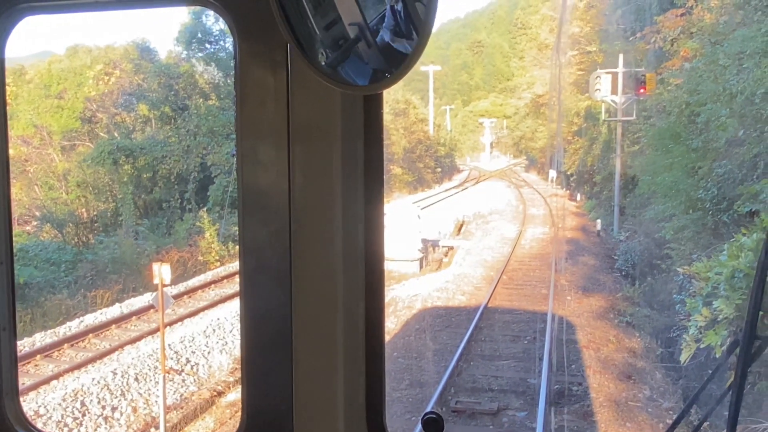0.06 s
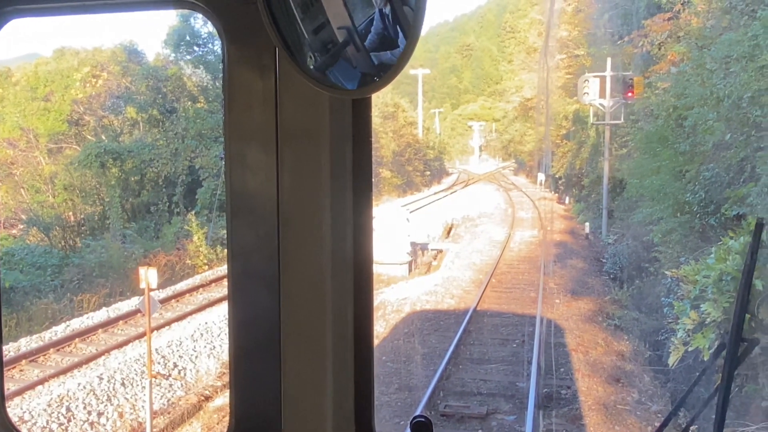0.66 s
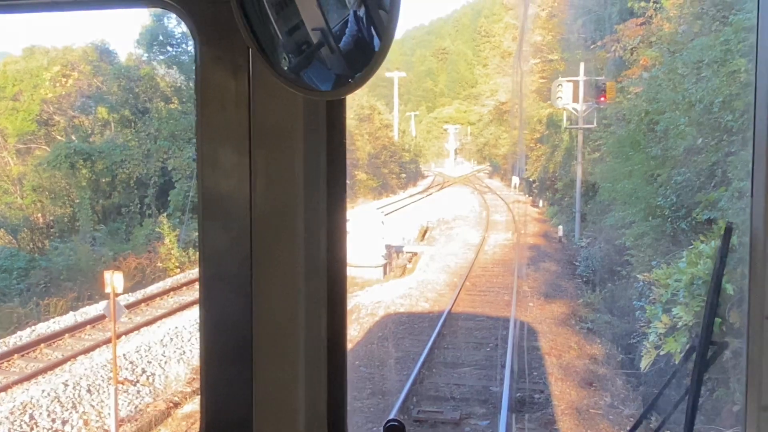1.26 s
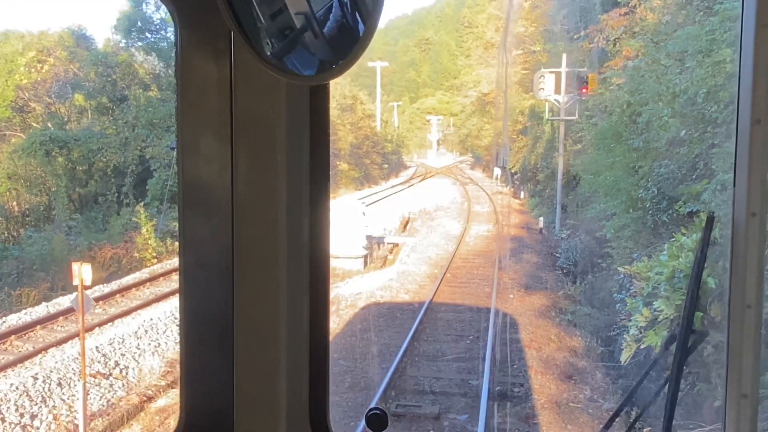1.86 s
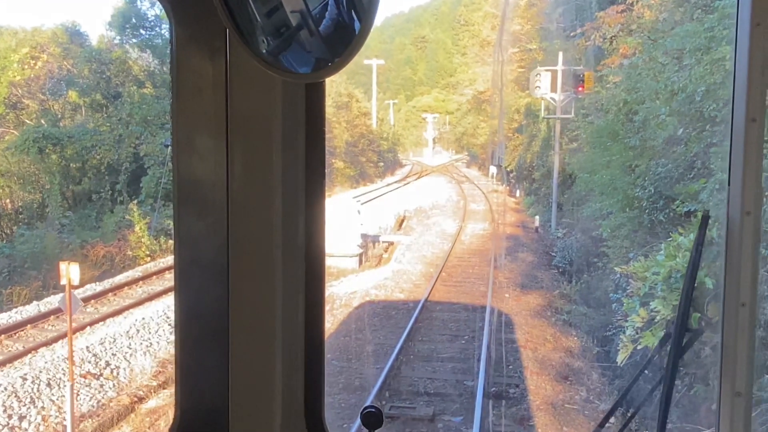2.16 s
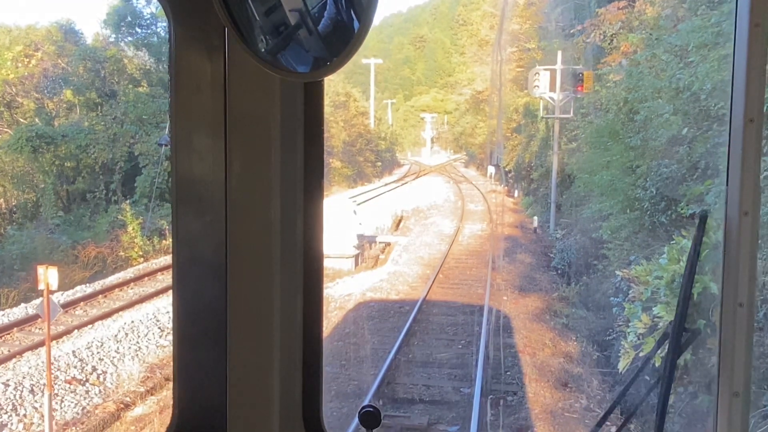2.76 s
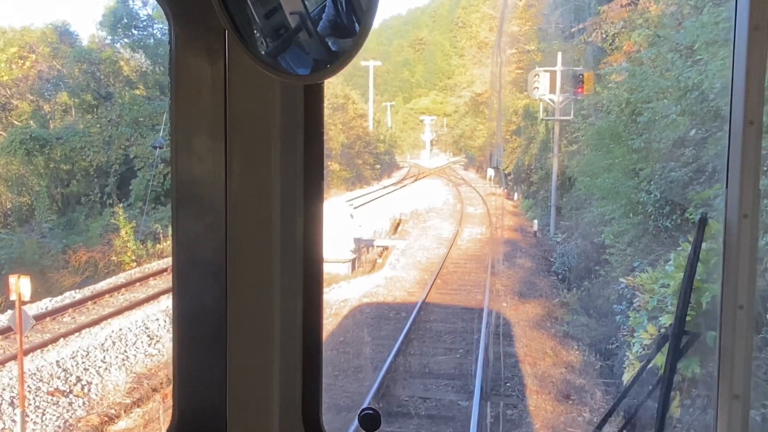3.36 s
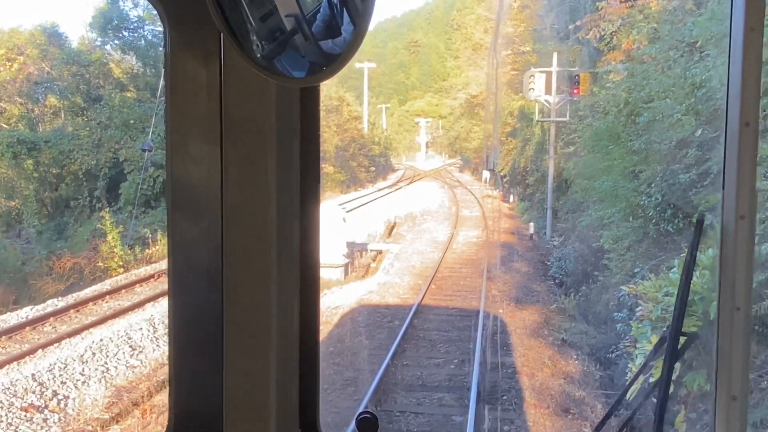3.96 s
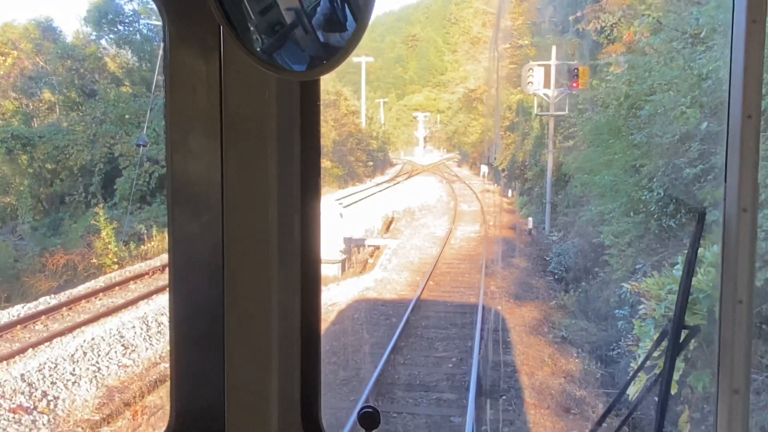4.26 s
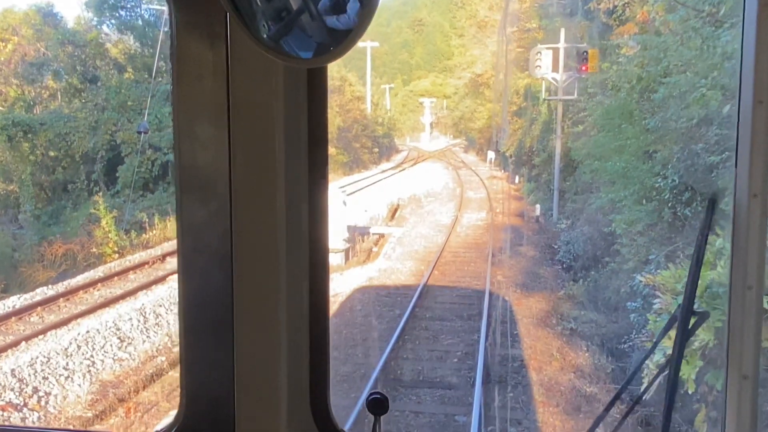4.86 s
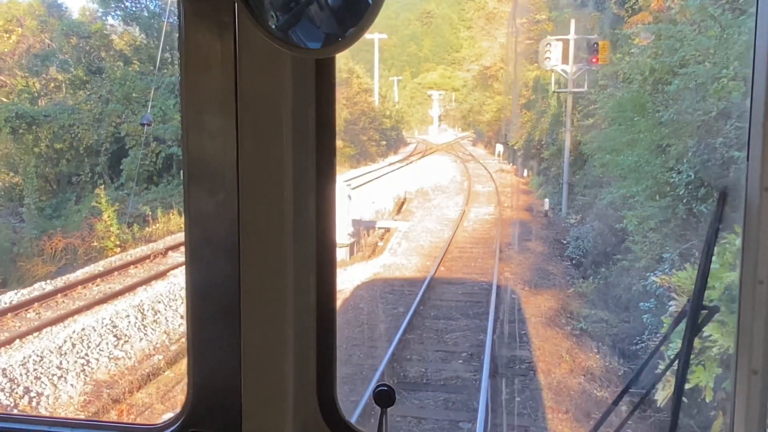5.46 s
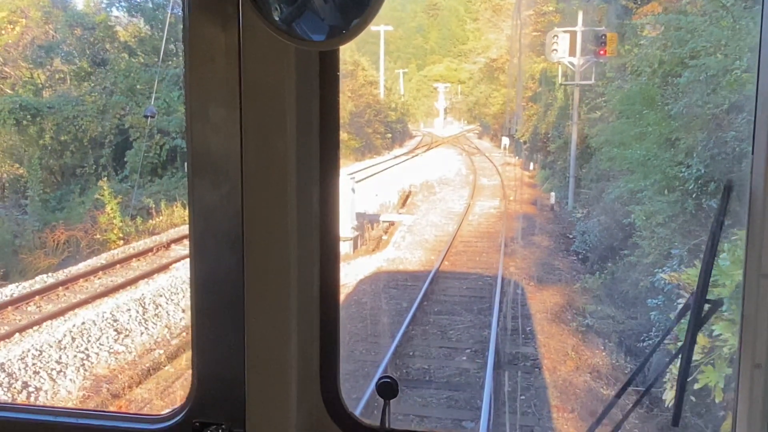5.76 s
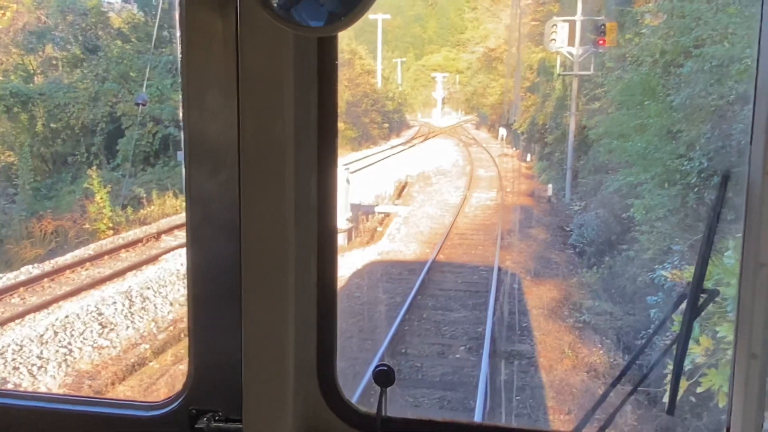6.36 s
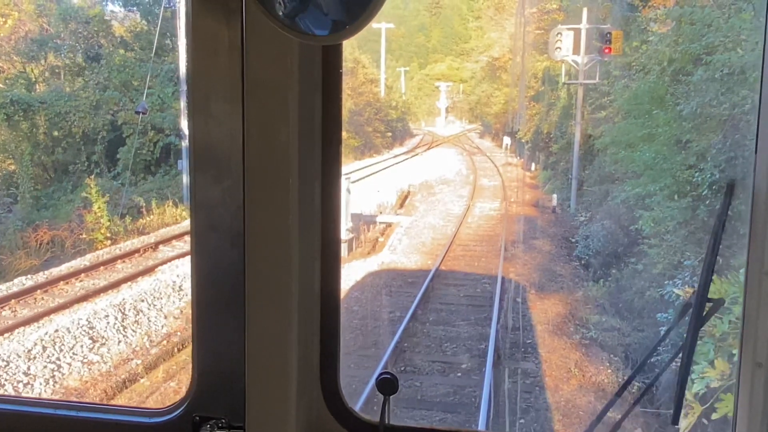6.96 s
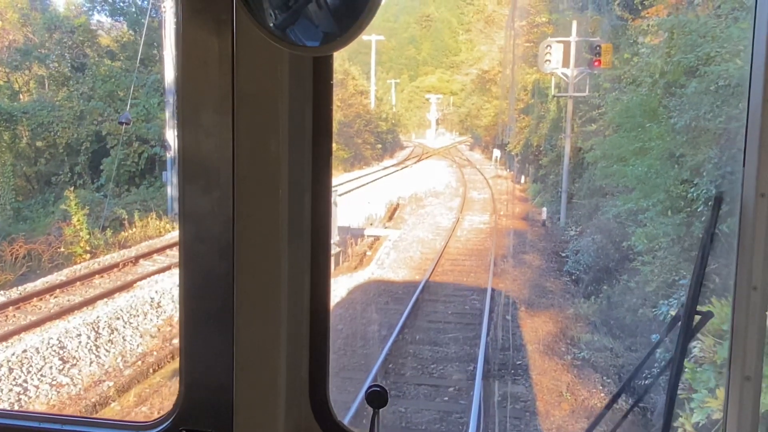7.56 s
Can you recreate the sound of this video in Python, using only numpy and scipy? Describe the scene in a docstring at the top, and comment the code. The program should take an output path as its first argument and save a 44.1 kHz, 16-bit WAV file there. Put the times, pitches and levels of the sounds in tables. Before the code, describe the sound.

Inside the cab of a diesel railcar, the engine revs up at once and holds high speed from about 1 second, with a booming exhaust, knocking through the floor and a loose fitting buzzing. Low body rumble, steady ventilation and a faint high electronic sizzle run throughout, and a second engine drones further back. A light click comes at 1.3 seconds. At 3.5 seconds an air valve puffs and the engine falls to an uneven idle, with a short low groan at 4 seconds. Brake air swells to a peak near 5.7 seconds while the engine labours briefly. Low clunks sound between 5.6 and 5.9 seconds, followed by a sharp click at 6 seconds, with brief squeaks from the running gear around them. From about 6.5 seconds the engine revs up again, staying loud until the end at around 7.5 seconds.

```python
"""Diesel railcar cab, creeping away

The six-cylinder engine runs up, falls back to idle and runs up again. Its exhaust booms in the cab,
its knock comes through the floor and a loose fitting buzzes with the firings. A second engine drones
further back. Air valves hiss, controls click and running gear squeaks over a bed of body rumble,
ventilation and faintly sizzling electronics."""
import sys
import numpy as np
from scipy import signal
from scipy.fft import rfft, irfft, next_fast_len
from scipy.io import wavfile
from scipy.ndimage import uniform_filter1d

SR = 44100
rng = np.random.default_rng(int(sys.argv[2]) if len(sys.argv) > 2 else 0)


def wrap_up_sound(samples):
    """Save the sound to the file named by the first command line argument, as 16-bit audio."""
    columns = np.atleast_2d(samples).T
    # keep every value between -1 and 1, then stretch to whole-number steps
    tamed = np.clip(columns, -1, 1)
    steps = np.round(tamed * 32767).astype(np.int16)
    wavfile.write(sys.argv[1], SR, steps)


N = 340011
TIME = np.arange(N) / SR
CYLINDERS, TOP_SPEED = 6, 46.28   # engine speeds are in firings per second


def from_db(db):
    """Decibels to gain."""
    return 10 ** (np.asarray(db) / 20)


def rms_one(x):
    """Scale to unit power."""
    return x / np.sqrt(np.mean(x ** 2) + 1e-20)


def noise():
    """White noise."""
    return rng.standard_normal(N)


def drift(rate_hz):
    """Smooth random wander at unit power."""
    knots = rng.standard_normal(4000)
    return rms_one(np.interp(TIME * rate_hz, np.arange(len(knots)), knots))


def swell(centre_s, half_width_s):
    """A bell curve of height 1."""
    return np.exp(-.5 * ((TIME - centre_s) / half_width_s) ** 2)


def through(x, response):
    """Filter by a gain given as a function of Hz."""
    size = next_fast_len(N + SR // 2)
    hz = np.fft.rfftfreq(size, 1 / SR) + 1e-3
    return irfft(rfft(x, size) * response(hz), size)[:N]


def colour(x, points):
    """EQ curve with steep skirts beyond its ends; unit power."""
    hz, db = np.transpose(points)
    skirts = lambda f: 1 / np.sqrt((1 + (.8 * hz[0] / f) ** 8) * (1 + (.8 * f / hz[-1]) ** 8))
    return rms_one(through(x, lambda f: skirts(f) * from_db(np.interp(np.log(f), np.log(hz), db))))


def resonate(x, hz, *widths_hz):
    """Resonators in series, one per width, each peaking at gain 1."""
    for width in widths_hz:
        r = np.exp(-np.pi * width / SR)
        feedback = [1, -2 * r * np.cos(2 * np.pi * hz / SR), r * r]
        x = signal.lfilter(np.array([1, 0, -1]) * (1 - r * r) / 2, feedback, x)
    return x


# The breath of the fan. Each row: frequency in Hz, relative level in dB.
FAN_EQ = [(400, -12), (600, -2.5), (1000, -16.5), (1200, -21), (1750, -12), (2200, -18), (4200, -26),
          (6200, -36), (7900, -34), (11200, -36), (14000, -41), (15500, -56)]

def ventilation(level_db=-45):
    """The fan fills the cab with a steady wash of air."""
    return from_db(level_db) * colour(noise(), FAN_EQ)


# A thin band of sizzle. Each row: frequency in Hz, relative level in dB.
SIZZLE_EQ = [(7800, -20), (8800, 1), (9400, 5), (9800, 6.5), (10250, 3.5), (10600, -3), (11200, -30)]

def electronics(sweep_rate_hz=23.4, centre_hz=9750, swing_hz=450, tone_db=-56, band_db=-54):
    """A rough high carrier sweeps down over and over inside a pulsing sizzle."""
    sweeps = TIME * sweep_rate_hz
    hz = centre_hz + swing_hz * (1 - 2 * (sweeps % 1)) + 150 * drift(500)
    carrier = from_db(tone_db) * np.sin(2 * np.pi * np.cumsum(hz) / SR)
    pulsing = 1 + .23 * (np.sin(2 * np.pi * sweeps) + np.sin(2 * np.pi * 3 * sweeps))
    return pulsing * (carrier + from_db(band_db) * colour(noise(), SIZZLE_EQ))


# The weight of the car body. Each row: frequency in Hz, relative level in dB.
BODY_EQ = [(28, -11), (45, -0.5), (70, 11.5), (110, 0), (170, 2), (220, 3.5), (290, 6), (390, 2.5),
           (460, -10.5), (800, -6.5)]

def body_rumble(level_db):
    """The car body shakes with a low, broad rumble."""
    return from_db(level_db) * colour(noise(), BODY_EQ)


def panel(floor_db, hz=895, width_hz=116.2, relative_db=-11.5):
    """The vibrating floor keeps a cab panel ringing."""
    return from_db(floor_db + relative_db) * rms_one(resonate(noise(), hz, width_hz, width_hz))


# The drone comes forward. Each row: centre and half width in seconds, level of the swell in dB.
DRONE_RISES = [(.28, 0.24, -23), (.78, 0.13, -30), (5.47, .36, -20.5), (6.8, 0.36, -24.5)]

def second_engine(revs, drone_hz=65.85, sag_hz=4.97, bed_db=-38):
    """A drone carried along the car sags once under load; at full revs only its swells remain."""
    hz = drone_hz - sag_hz * swell(6.35, .189)
    swells = sum(from_db(db) * swell(s, width) for s, width, db in DRONE_RISES)
    gain = from_db(bed_db) * (1 - revs) + swells
    return gain * np.sqrt(2) * np.sin(2 * np.pi * np.cumsum(hz) / SR)


# Squeaks and groans. Each row: start and length in seconds, first and last pitch in Hz, level in dB.
GEAR_SQUEAKS = [(0.23, 0.2, 5570, 5580, -61), (3.97, 0.34, 308, 285, -35.5), (5.74, 0.23, 2140, 2156, -50),
                (6.175, 0.17, 898, 884, -37), (6.598, 0.4, 5480, 5620, -61)]

def squeaks(waver=.018):
    """Rubbing parts of the running gear sing briefly on an unsteady pitch."""
    out = np.zeros(N)
    for start, length, first_hz, last_hz, db in GEAR_SQUEAKS:
        along = np.clip((TIME - start) / length, 0, 1)
        hz = (first_hz + (last_hz - first_hz) * along) * (1 + waver * drift(400))
        tone = np.sqrt(2) * np.sin(2 * np.pi * np.cumsum(hz) / SR)
        out += from_db(db) * np.sin(np.pi * along) * tone
    return out


# Puffs, clunks and clicks. Each row: start in seconds, level in dB, centre in Hz,
# half width in octaves, attack in seconds, time to fall 60 dB in seconds.
CLICK_CUES = [(1.265, -44, 4000, 0.34, 0.0071, 0.11), (3.477, -36, 2375, 0.52, .008, 0.38),
              (3.48, -36.5, 6500, .6, .005, 0.19), (4.236, -59, 13000, .3, .01, .16),
              (5.242, -52, 12900, .3, 0.0056, .08), (5.58, -32.5, 334, 0.24, 0.048, 0.79),
              (5.6, -31, 1010, 0.28, 0.034, 0.2), (5.83, -38, 1550, 0.22, 0.018, 0.27),
              (5.858, -24.5, 283, 0.3, .006, 0.3), (5.87, -51, 13000, .3, .02, .4),
              (5.954, -39, 12950, 1.2, 0.0077, 0.25), (5.962, -26.5, 12500, 1.5, .0006, 0.016),
              (6.278, -50, 4750, .1, .006, .12), (6.279, -62, 13050, .03, .006, .06)]

def clicks():
    """Valves, couplings and levers give short bursts of noise that die in the cab."""
    out = np.zeros(N)
    for start, db, hz, octaves, attack, t60 in CLICK_CUES:
        age = np.maximum(TIME - start, 0)
        burst = rms_one(through(noise(), lambda f: np.exp(-.5 * (np.log2(f / hz) / octaves) ** 2)))
        decay_db = 60 * np.clip((age - attack) / t60, 0, 2)
        out += burst * np.minimum(age / attack, 1) * from_db(db - decay_db)
    return out


# The hiss of the brakes. Each row: frequency in Hz, relative level in dB.
AIR_EQ = [(1500, 20.5), (3000, 12.5), (5000, 8.5), (8000, 7.5), (11000, 4), (13000, 6), (15500, -1)]

def brake_air(peak_s=5.69, peak_db=-40.5, rise_db_per_s=28.5, fall_db_per_s=78):
    """Brake air swells through an exhaust port and dies away."""
    age = TIME - peak_s
    db = peak_db + np.minimum(rise_db_per_s * age, -fall_db_per_s * age)
    return from_db(db) * colour(noise(), AIR_EQ)


# The fitting's bright modes. Each row: frequency and nominal width in Hz, relative level in dB.
FITTING_MODES = [(5360, 190, 2), (6950, 14000, -5), (11620, 1700, -6.5), (12440, 250, 7.5),
                 (13250, 3000, 1.5), (13900, 1200, -12), (14200, 280, 1), (15400, 600, 0)]

def fitting_buzz(cycle, speed, settling_db, idle_db=-73, loose_db=-49):
    """Every firing shakes a loose fitting into a short chatter, louder at speed."""
    db = settling_db + np.interp(speed, [30.4, 43.3], [idle_db, loose_db])
    since_firing = (CYLINDERS * cycle) % 1
    chatter = noise() * np.exp(-1.2 * since_firing) * from_db(1.5 * drift(46))
    ringing = sum(from_db(mode_db) * resonate(chatter, hz, 1.3 * width, 1.3 * width)
                  for hz, width, mode_db in FITTING_MODES)
    return from_db(db) * rms_one(ringing)


# The driver's two run-ups. Each row, all in seconds: throttle opened, throttle shut,
# delay to the steepest climb in speed, time constant of the climb.
RUN_UPS = [(-.26, 3.61, .65, .085), (6.25, 9, .555, .1)]

def throttle(fuel_rise_s=.37, fuel_cut_s=.16, coast_s=.19):
    """Fuel and revs, each 0-1: revs follow late on an S-curve and coast down when fuel is cut."""
    fuel, revs = np.zeros(N), np.zeros(N)
    for opened, shut, delay, climb_s in RUN_UPS:
        since_shut = np.maximum(TIME - shut, 0)
        fed = np.clip((TIME - opened) / fuel_rise_s, 0, 1)
        fuel += fed * np.clip(1 - since_shut / fuel_cut_s, 0, 1)
        climb = .5 + .5 * np.tanh((TIME - opened - delay) / (2 * climb_s))
        revs += climb * np.exp(-(since_shut / coast_s) ** 2)
    return fuel, revs


# The hunting idle. Each row: time in seconds, speed in firings per second.
IDLE_HUNT = [(3.9, 32.5), (4.6, 30), (5.1, 33.2), (5.55, 33.4), (5.7, 36), (6, 36), (6.3, 31.2),
             (6.6, 32.5)]

def engine_speed(revs):
    """The revs lift the engine from idle to the speed held by the governor."""
    idle = np.interp(TIME, *np.transpose(IDLE_HUNT))
    return idle + (TOP_SPEED - idle) * revs


# Rides on the rattle. Each row: seconds after the steepest climb, half width in seconds,
# buzz change in dB, clatter change in dB.
RATTLE_RIDES = [(.58, .15, 5, 1), (.94, 0.082, -10, -.5), (1.35, 0.45, -3, -0.66)]

def settling():
    """After each run-up, buzz and clatter peak, drop and creep back; two curves in dB."""
    return sum(np.outer([buzz_db, clatter_db], swell(opened + delay + after, width))
               for opened, _, delay, _ in RUN_UPS for after, width, buzz_db, clatter_db in RATTLE_RIDES)


# The idling engine eases, then labours as the drive takes hold. Each row: centre and half width
# in seconds, then the change of boom, growl and knock in dB.
LOAD_SURGES = [(4.02, .1, 4.5, -14, -1.5), (5.6, 0.22, -2, 5, 6), (5.71, 0.074, 14, 1, 0),
               (6.162, 0.075, 10.5, -4, 3)]

def effort(fuel, revs, speed):
    """Boom, growl, knock and rumble levels in dB; the engine flares just short of top speed."""
    flare = fuel * np.interp(speed, [36.8, 44.34, TOP_SPEED], [0, 1, 0])
    boom = -29 + 10.5 * fuel + 5.5 * revs - .5 * flare
    growl = -36 + 10.5 * fuel - 2 * revs + 12.5 * flare
    knocking = -40 + 9.5 * fuel + 2.5 * revs + 2.5 * flare
    body = -33.5 + 5 * fuel - 2 * revs + 1.5 * flare
    for s, width, boom_db, growl_db, knock_db in LOAD_SURGES:
        surge = swell(s, width)
        boom += boom_db * surge
        growl += growl_db * surge
        knocking += knock_db * surge
        body += .5 * knock_db * surge
    return boom, growl, knocking, body


def cylinder_blows(cycle, build_up_s=.012, ring_t60_s=.13, vary_db=.5):
    """Each cylinder strikes the frame with its own echo pattern, which builds up and rings out."""
    fired = np.flatnonzero(np.diff(np.floor(cycle * CYLINDERS))) + 1
    age = np.arange(SR // 6) / SR
    envelope = (1 - np.exp(-age / build_up_s)) * from_db(-60 * age / ring_t60_s)
    paths = rng.standard_normal((CYLINDERS, len(age))) * envelope
    blows = np.zeros(N)
    for cylinder, path in enumerate(paths):
        at = fired[cylinder::CYLINDERS]
        strikes = np.zeros(N)
        strikes[at] = from_db(vary_db * rng.standard_normal(100)[:len(at)])
        blows += signal.fftconvolve(strikes, path)[:N]
    return rms_one(blows)


# Knock heard through the floor. Each row: frequency in Hz, relative level in dB.
FLOOR_EQ = [(200, -10.5), (280, -7), (400, -17.5), (450, -7), (600, -8), (740, -6), (860, -2), (1030, -4),
            (1180, -10.5), (1900, -17), (2600, -25), (5200, -34), (8000, -42.5)]
# The ring of the engine block. Each row: frequency in Hz, relative level in dB.
BLOCK_MODES = [(402, -14), (671, -21.5), (763, -17), (817, -10.5), (856, -16.5), (895, -26), (958, -22),
               (1018, -22.5), (1064, -20.5), (1272, -22), (1504, -27)]

def knock(fuel, cycle, settling_db, width_hz=11, hiss_db=-7):
    """Combustion blows clatter through the floor and ring the block, which sings out under fuel."""
    blows = cylinder_blows(cycle)
    block = sum(from_db(db) * rms_one(resonate(blows, hz, width_hz, 2 * width_hz))
                for hz, db in BLOCK_MODES)
    # the treble of a blow never repeats exactly, so noise takes over up there
    lowpass = lambda f: 1 / np.sqrt(1 + (f / 2600) ** 4)
    hiss = through(noise(), lambda f: np.sqrt(1 - lowpass(f) ** 2 + from_db(hiss_db) ** 2))
    clatter = colour(through(blows, lowpass) + hiss, FLOOR_EQ)
    return from_db(settling_db - 3) * clatter + from_db(7 * fuel - 9) * block


# The engine's voice. Each row: multiple of the four-stroke cycle rate, relative level in dB.
EXHAUST_ORDERS = [(9, -25), (11, -39), (12, 0), (13, -16.5), (14, -15), (15, -15), (17, -16), (18, -18),
                  (19, -19), (20, -19), (21, -26), (22, -32.5), (23, -18.5), (24, -23), (27, -30.5),
                  (30, -28), (32, -26.5)]

def exhaust(speed, cycle, boom_db, growl_db, bands_hz=((86, 119), (124, 192)), strain_db=7):
    """Low engine orders slide through the cab's boom band and the growl band above it."""
    acceleration = uniform_filter1d(np.gradient(speed) * SR, SR // 4)
    strain = np.clip(acceleration / 10, 0, 1)
    rough_radians = np.interp(speed, [34, 45], [.86, .11])
    # unequal cylinders make the crank hurry and lag once a cycle
    crank = cycle + .00068 * np.sin(2 * np.pi * cycle)
    waves, powers = np.zeros((2, N)), np.full((2, N), 1e-9)
    for order, db in EXHAUST_ORDERS:
        # every second firing is stronger: its orders keep in step and stand out as speed builds
        paired = order % 3 == 0
        offset = rng.normal(0, .6 if paired else 2)
        gain = from_db(db + strain_db * strain * paired)
        tone = np.sin(2 * np.pi * order * crank + offset + rough_radians * drift(14))
        hz = order * speed[::100] / CYLINDERS
        for band, (low, high) in enumerate(bands_hz):
            passed = 1 / np.sqrt((1 + (low / hz) ** 40) * (1 + (hz / high) ** 40))
            weight = gain * np.interp(TIME, TIME[::100], passed)
            waves[band] += weight * tone
            powers[band] += weight ** 2 / 2
    boom, growl = waves / np.sqrt(powers)
    # the firing note itself only carries at speed
    firing = np.interp(speed, [36, 45], [0, 1]) * np.sqrt(2) * np.sin(2 * np.pi * CYLINDERS * crank)
    return from_db(boom_db) * (boom + from_db(-23) * firing) + from_db(growl_db) * growl


def cab(x, echo_db=-10.5, count=14):
    """Short reflections from glass and panels comb the treble."""
    treble = through(x, lambda f: 1 / np.sqrt(1 + (1500 / f) ** 4))
    lags = (rng.uniform(.002, .022, count) * SR).astype(int)
    echoes = sum((-1) ** k * np.pad(treble, (lag, 0))[:N] for k, lag in enumerate(lags))
    return x + from_db(echo_db) * echoes / np.sqrt(count)


def scene():
    """The mono mix at the driver's seat."""
    fuel, revs = throttle()
    speed = engine_speed(revs)
    cycle = np.cumsum(speed) / (CYLINDERS * SR)   # running count of four-stroke cycles
    boom_db, growl_db, knock_db, body_db = effort(fuel, revs, speed)
    buzz_ride_db, clatter_ride_db = settling()
    engine = exhaust(speed, cycle, boom_db, growl_db)
    engine += from_db(knock_db) * knock(fuel, cycle, clatter_ride_db)
    bed = body_rumble(body_db) + ventilation() + panel(body_db) + second_engine(revs)
    fizz = fitting_buzz(cycle, speed, buzz_ride_db) + electronics()
    spot_effects = brake_air() + clicks() + squeaks()
    return cab(bed + spot_effects + fizz + engine)[None]


def record(dry, cutoff_hz=15750):
    """A steep low-pass takes off the very top."""
    return signal.sosfilt(signal.ellip(12, .1, 90, cutoff_hz, fs=SR, output="sos"), dry)


dry = scene()
out = record(dry)
wrap_up_sound(out)
```